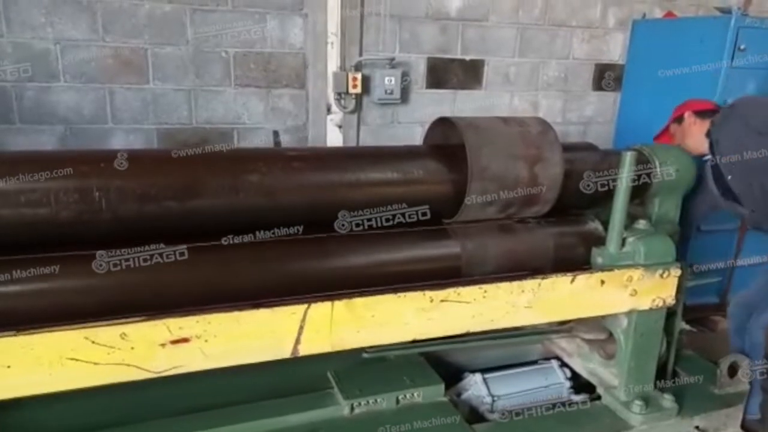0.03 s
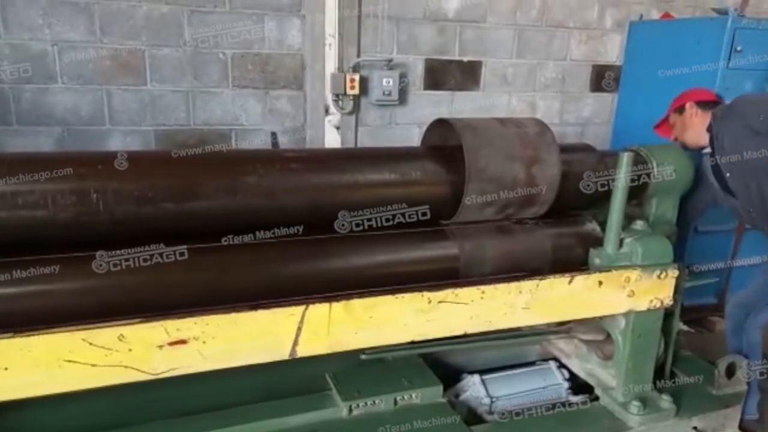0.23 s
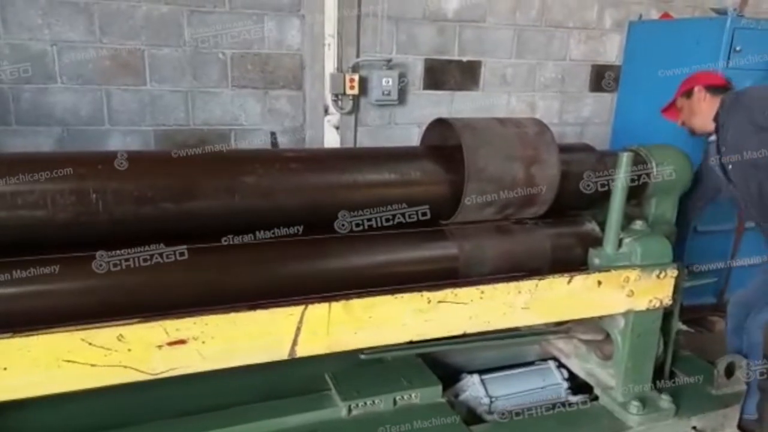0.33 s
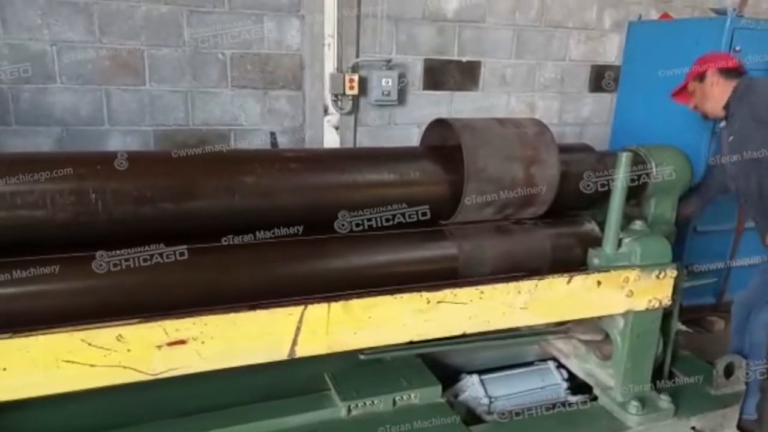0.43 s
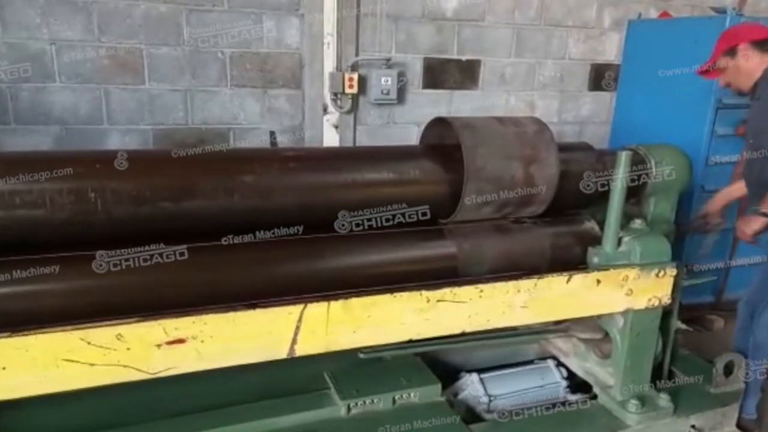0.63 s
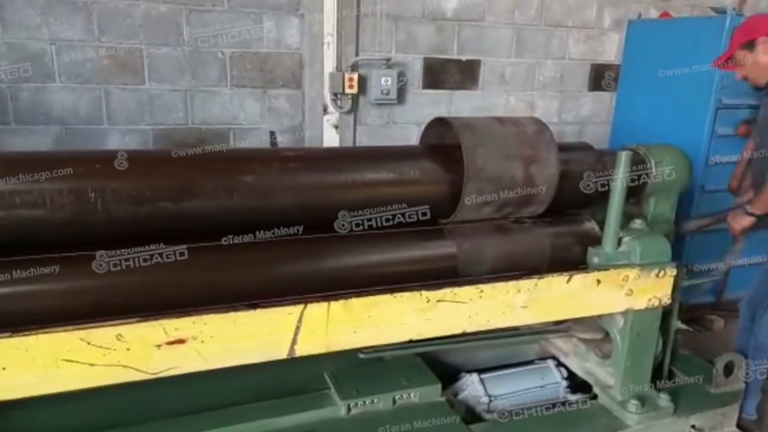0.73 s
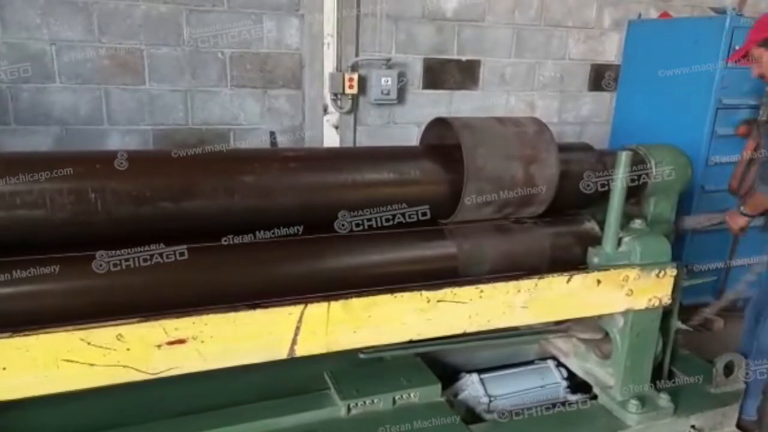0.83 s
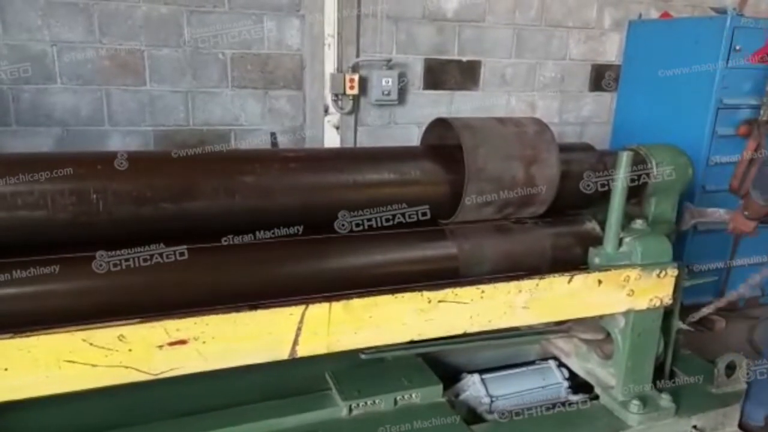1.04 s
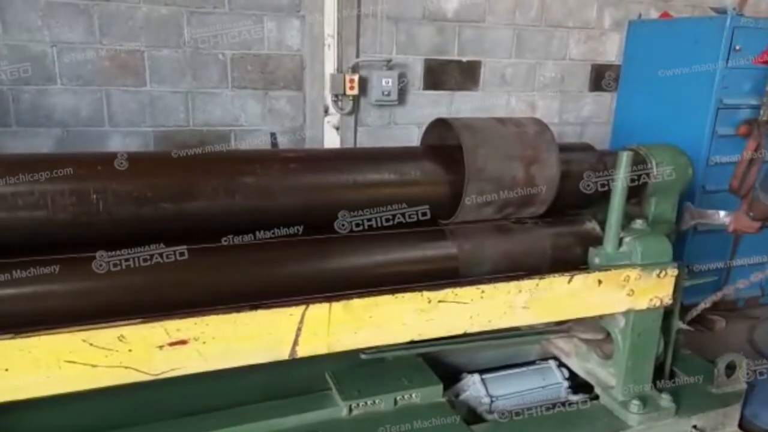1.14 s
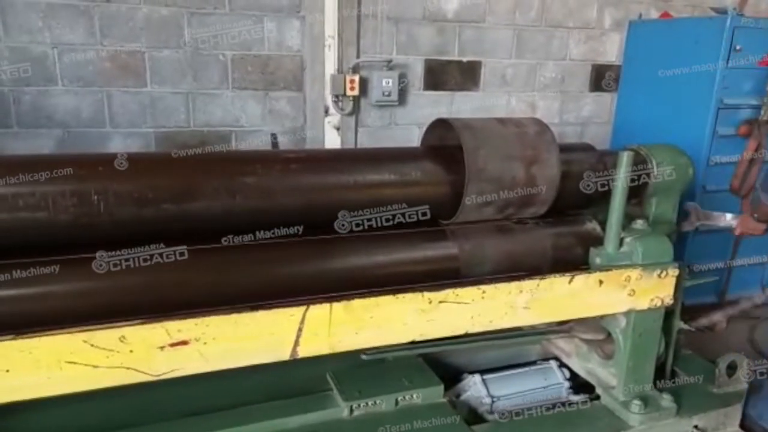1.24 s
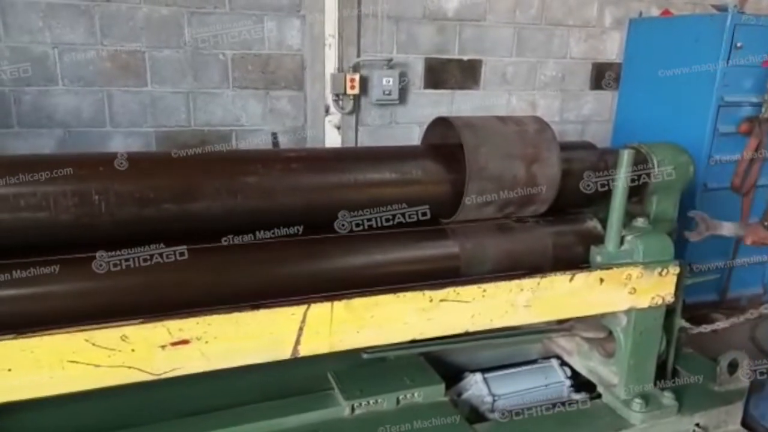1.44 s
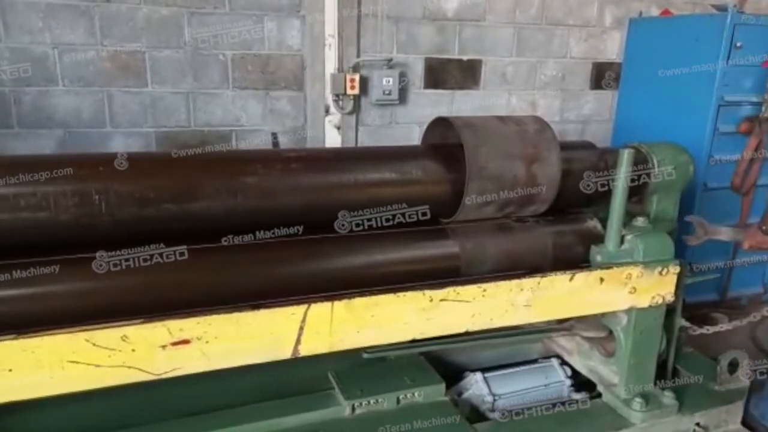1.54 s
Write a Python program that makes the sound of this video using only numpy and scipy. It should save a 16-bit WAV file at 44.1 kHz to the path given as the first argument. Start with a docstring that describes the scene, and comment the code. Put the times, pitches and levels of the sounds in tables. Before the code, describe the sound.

Heavy steel clunks twice and rings, just after a short groaning scrape of steel on steel. Lighter knocks, two soft booms and a tool clink follow, close by in an echoing workshop with a low rumble.

```python
"""A block-walled workshop, a stereo pair close to the end of a plate-rolling machine.
A worker handles a heavy steel tool: steel drags over steel, groaning as its slips shake the
frame into a hollow judder, then clunks twice and rings. Lighter knocks follow, with two soft
booms of the frame and a clink of the tool. The hall echoes behind the drag and the knocks,
over a low rumble, a thin whine and a slowly fading hiss."""
import sys
import numpy as np
from scipy import signal
from scipy.fft import rfft, irfft, next_fast_len
from scipy.io import wavfile
from scipy.ndimage import uniform_filter1d, minimum_filter1d, map_coordinates

SR = 44100
rng = np.random.default_rng(int(sys.argv[2]) if len(sys.argv) > 2 else 0)


def generate_wav(sig):
    """Save sig (samples, or channels by samples) to the path in sys.argv[1] as 16-bit PCM at SR."""
    pcm = np.round(np.clip(np.atleast_2d(sig).T, -1, 1) * 32767).astype(np.int16)
    wavfile.write(sys.argv[1], SR, pcm)


N = 70560


def amp(db):
    return 10 ** (np.asarray(db) / 20)


def unit(x):
    return x / np.sqrt(np.mean(x ** 2) + 1e-20)


def clock():
    return np.arange(N) / SR


def rise(time_s):
    return (1 - np.exp(-clock() / time_s)) ** 2


def fade(t60):
    return np.exp(-np.log(1000) * clock() / t60)


def wobble(rate):
    """A smooth random curve, rate knots a second."""
    return map_coordinates(rng.standard_normal(400), [clock() * rate], mode="wrap")


def along(points, hz):
    """Read (f/Hz, value) points on a log frequency axis."""
    f, v = np.transpose(points)
    return np.interp(np.log(hz + 1), np.log(f + 1), v)


def level(rows):
    """Gain per sample from (t/s, level/dB) points."""
    return amp(np.interp(clock(), *np.transpose(rows)))


def filtered(x, response):
    """x times a response of frequency."""
    size = next_fast_len(2 * N)
    return irfft(rfft(x, size) * response(np.fft.rfftfreq(size, 1 / SR)), size)[..., :N]


def delayed(x, s):
    return np.pad(x, ((0, 0), (max(round(s * SR), 0), 0)))[:, :N]


def spread(hz):
    """Half the phase angle between the microphones: small in the bass, wide in the treble."""
    # likeness of left and right: f/Hz, correlation
    likeness = [(100, .95), (300, 0.91), (600, 0.57), (1200, 0.072), (2500, 0), (6000, 0.068)]
    return np.arccos(np.clip(along(likeness, hz), -1, 1)) / 2


def noise(colour, flutter=1):
    """Stereo noise of rms 1, roughened by a flutter; colour is its gain over frequency."""
    white = flutter * rng.standard_normal((2, N))
    mid, side = filtered(white, lambda hz: colour(hz) * np.array([np.cos(spread(hz)), np.sin(spread(hz))]))
    return unit(np.array([mid + side, mid - side]))


def dying(x, t60s, hold_s=0):
    """After the hold each frequency of x dies at its own speed."""
    hz, t, spectra = signal.stft(x, SR, nperseg=256)
    fall_db = -60 * np.maximum(t - hold_s, 0) / along(t60s, hz)[:, None]
    return signal.istft(spectra * amp(fall_db), SR, nperseg=256)[1][:, :N]


def resonances(rows, hz):
    """Response of a body with (f/Hz, width/Hz, level/dB) resonances."""
    return sum(amp(db) * 1j * hz * width / (f * f - hz * hz + 1j * hz * width) for f, width, db in rows)


def ringing(modes, colour, waver_rad=.38):
    """Decaying, slightly wavering modes, each reaching the two microphones in its own phase."""
    out = np.zeros((2, N))
    for k, (hz, db, t60) in enumerate(modes):
        phase = rng.uniform(0, 2 * np.pi) + waver_rad * wobble(36.4)
        mic_phase = (-1) ** k * spread(hz) * np.array([[1], [-1]])
        out += amp(db) * colour(hz) * fade(t60) * np.sin(2 * np.pi * hz * clock() + phase + mic_phase)
    return out


def hall(x, wet_db, predelay_s=.012):
    """The direct sound, then the diffuse echo off the block walls."""
    # reverberation of the workshop: f/Hz, t60/s
    decay = [(100, 1.14), (400, 2.34), (900, 1.88), (2000, 1.486), (3500, 1.14), (6000, 0.66),
             (12000, 0.46)]
    tail = delayed(dying(noise(np.ones_like), decay), predelay_s)
    echo = signal.fftconvolve(x[:1], tail / np.linalg.norm(tail[0]), axes=1)[:, :N]
    return x + amp(wet_db) * echo


def room_tone(whine_hz=2017):
    """An uneven workshop rumble, with a hiss and a narrow whine that both fade."""
    # swells of the rumble: t/s, level/dB
    swells = [(0, -45.5), (.05, -50.5), (.17, -51), (.28, -49), (.43, -45), (.48, -47.5), (.57, -46),
              (.78, -49.5), (.87, -56.5), (.97, -55.5), (1.03, -48), (1.31, -49.5), (1.37, -53),
              (1.48, -53), (1.54, -50), (1.59, -48)]
    # spectra of rumble and hiss: f/Hz, relative density/dB
    rumble_spectrum = [(25, -42), (45, -29), (62, -6), (88, 1.5), (130, -2), (200, -8), (400, -12.5),
                       (1000, -17.5), (2300, -69), (3200, -56)]
    hiss_spectrum = [(1000, 2), (2200, 4), (3000, -11.5), (4200, 2.5), (6300, 7.5), (7000, -5),
                     (7700, -23.5), (9000, -3), (11000, -0.5), (12200, 6.5), (13500, 3.5), (15000, 10),
                     (16000, -3)]
    t = clock()
    rumble = level(swells) * noise(lambda hz: amp(along(rumble_spectrum, hz)))
    hiss = amp(-43 - 5.5 * t) * noise(lambda hz: amp(along(hiss_spectrum, hz)))
    whine = amp(-47 - 9 * t) * noise(lambda hz: resonances([(whine_hz, 190, 0)], hz) ** 2)
    return rumble + hiss + whine


def groan(waver_rad=.3):
    """The dragged steel sings one unsteady low note."""
    # course of the note: t/s, f/Hz, level/dB
    course = [(.14, 335, -75), (.17, 340, -40), (.2, 362, -29), (.22, 364, -24), (.236, 336, -32),
              (.25, 330, -27.5), (.29, 329, -29), (.345, 350, -34), (.38, 378, -44), (.42, 378, -75)]
    s, pitch_hz, db = np.transpose(course)
    phase = 2 * np.pi * np.cumsum(np.interp(clock(), s, pitch_hz)) / SR + waver_rad * wobble(111.1)
    return amp(np.interp(clock(), s, db)) * unit(np.sin(phase))


def drag(slips_per_s=944, scatter_db=4.5, low_hz=200, top_hz=2770):
    """Steel sliding on steel groans, while uneven slips shake the frame and throw off grit."""
    # strength of the slide: t/s, level/dB
    stroke = [(.13, -88), (.16, -53), (.18, -40), (.2, -33), (.22, -30), (.235, -31), (.25, -31.5),
              (.29, -32), (.33, -37), (.39, -51.5), (.42, -91)]
    # resonances of the machine frame: f/Hz, width/Hz, level/dB
    frame = [(276, 10.5, 5.5), (362, 85, -4), (484, 26, -3.5), (580, 12, -28), (957, 10, 4), (1306, 62, -9),
             (1903, 20, 4.5), (2510, 21, -2)]
    # spectrum of the grit: f/Hz, relative density/dB
    grit_spectrum = [(30, -53), (150, -21.5), (330, 10.5), (650, -15), (1200, 5), (2000, -6), (3000, -15),
                     (6300, -20), (7000, -68), (7500, -62), (15000, -72)]
    slips = (rng.random(N) < slips_per_s / SR) * amp(scatter_db * rng.uniform(-0.93, 1, N))
    passband = lambda hz: 1 / (1 + (hz / top_hz) ** 6) / (1 + (low_hz / (hz + 1)) ** 4)
    judder = unit(filtered(slips, lambda hz: resonances(frame, hz) * passband(hz)))
    bite = signal.lfilter([1], [1, -np.exp(-1 / (.01 * SR))], slips)  # each slip lingers about 10 ms
    grit = noise(lambda hz: amp(along(grit_spectrum, hz)), bite)
    scrape = level(stroke) * (amp(-1.5) * judder + amp(4) * grit)
    return hall(scrape + groan(), wet_db=-12)


def clunks():
    """Each clunk builds, chatters briefly, clanks in dense modes and leaves the steel ringing."""
    # blows: t/s, level/dB, tilt/(dB per octave), attack/s, chatter/s, ring/dB, left minus right/dB
    blows = [(0.21, -25, -5, 0.0054, 0.0051, -6.5, 9.5), (0.26, -26.5, 9, 0.0022, 0.0048, -10.5, 3.5),
             (0.337, -16.5, -2, 0.0011, 0.015, 2, 2), (0.4212, -8.5, 0, 0.00092, .018, -3.5, 0.5),
             (.526, -30, -10.5, 0.0034, 0.03, -19, 0.5), (0.612, -28.5, -7.5, 0.0013, 0.0072, -3.5, -3),
             (0.85, -33.5, -2.5, 0.004, 0.015, -6, 1.5), (0.894, -34.5, -8.5, 0.0036, 0.0025, -4.5, -2.5),
             (1.0683, -31, 2.5, 0.0011, 0.0064, -3.5, -0.5)]
    # ringing modes of the steel: f/Hz, level/dB, t60/s
    steel_modes = [(608, -24, 1.3), (744, -23.5, 1.4), (780, -19.5, 1.6), (853, -19, 1.0), (931, -14.5, .9),
                   (1254, -17, .25), (1375, -18.5, .9), (1407, -7, .22), (1460, -19, 1.15),
                   (1498, -19.5, 1.15), (2093, -18, 1.0), (2389, -22, .8), (2763, -28, .9), (2912, -26, .9),
                   (3419, -28, .7), (3741, -29, .5), (5830, -16, .11)]
    # dense, short-lived modes of a blow: f/Hz, relative density/dB
    clank_spectrum = [(30, -59), (100, -44), (300, -19.5), (460, -10), (570, -23.5), (800, -0.5),
                      (1050, -10), (1350, 1.5), (1720, -6.5), (2150, -0.5), (2450, -6), (2800, -10),
                      (4000, -14), (4600, -20), (5400, -16), (5900, -15.5), (6700, -20), (7600, -47.5),
                      (10000, -41.5), (15000, -66)]
    # their decay: f/Hz, t60/s
    clank_decay = [(300, 0.33), (1500, 0.12), (6000, 0.11)]
    out = np.zeros((2, N))
    for s, db, tilt_db, attack_s, chatter_s, ring_db, pan_db in blows:
        tilt = lambda hz: amp(tilt_db * np.log2((hz + 100) / 1500))
        onset = rise(attack_s / 2)
        chatter = noise(lambda hz: amp(along(clank_spectrum, hz)) * tilt(hz))
        clank = amp(-3.5) * onset * dying(chatter, clank_decay, chatter_s)
        ring = amp(ring_db) * onset * ringing(steel_modes, tilt)
        mic_gains = amp(db + pan_db * np.array([[.5], [-.5]]))
        out += mic_gains * delayed(hall(clank, wet_db=-10.5) + ring, s)
    return out


def frame_booms(rise_s=.016):
    """The heavy frame swells into a soft boom as weight shifts on it."""
    # booms: t/s, level/dB
    booms = [(0.522, -43.5), (1.079, -40)]
    # their spectrum: f/Hz, relative density/dB
    spectrum = [(30, -43), (55, 2), (100, -8), (190, -16), (360, .5), (550, -13), (1200, -8.5),
                (4000, -42)]
    swell = (1 - np.exp(-clock() / rise_s)) * fade(t60=.8)
    return sum(delayed(amp(db) * swell * noise(lambda hz: amp(along(spectrum, hz))), s) for s, db in booms)


def tool_clink(at_s=1.0695):
    """The hand tool touches the machine and rings, light and bright."""
    # modes of the tool: f/Hz, level/dB, t60/s
    tool_modes = [(1314, -4, .15), (2320, -5, .06), (2700, -5, .06), (3795, -5, .05), (4100, -6, .03),
                  (4380, -4, .06), (4560, -4, .03), (5373, -13, .1)]
    return delayed(amp(-33.5) * rise(.0003) * ringing(tool_modes, np.ones_like), at_s)


def scene():
    return clunks() + tool_clink() + drag() + frame_booms() + room_tone()


def record(dry, hold_s=.0016, top_hz=15900):
    """Two microphones of slightly unlike colour feed a full-scale limiter and a treble cut-off."""
    # mismatch of the pair: f/Hz, left minus right/dB
    mismatch = [(100, -2), (600, -1), (1100, 0.5), (2000, -1.5), (4000, -5), (7000, 10), (13000, 1.7)]
    mics = filtered(dry, lambda hz: amp(along(mismatch, hz) * np.array([[.5], [-.5]])))
    safe_gain = np.minimum(1, 1 / (np.abs(mics).max(axis=0) + 1e-9))
    hold = int(hold_s * SR)
    limiter_gain = uniform_filter1d(minimum_filter1d(safe_gain, hold), hold)
    return filtered(mics * limiter_gain, lambda hz: hz < top_hz)


dry = scene()
out = record(dry)
generate_wav(out)
```